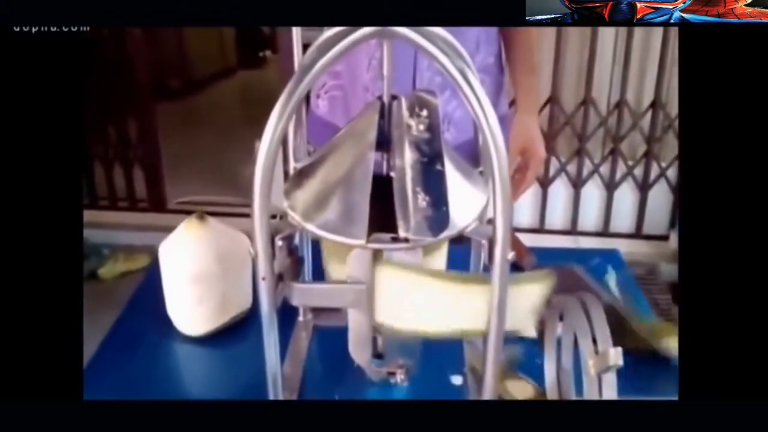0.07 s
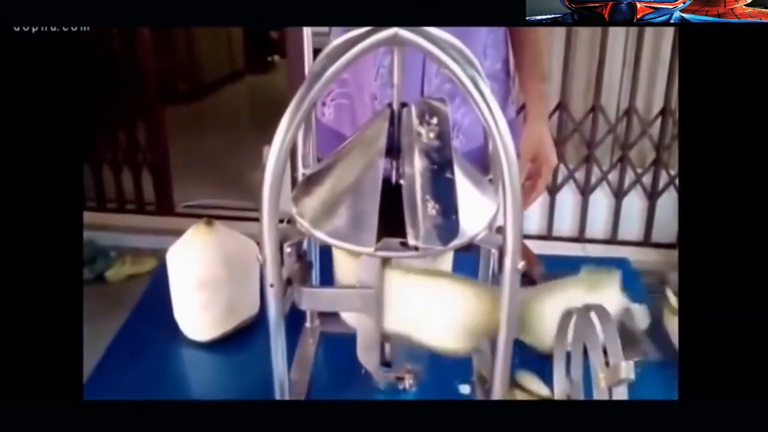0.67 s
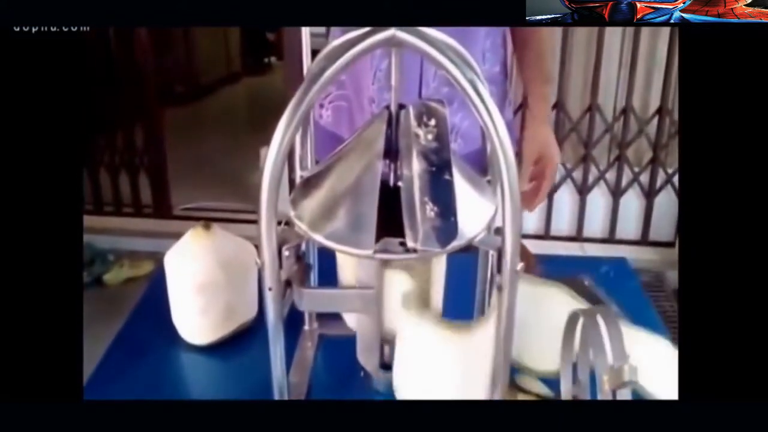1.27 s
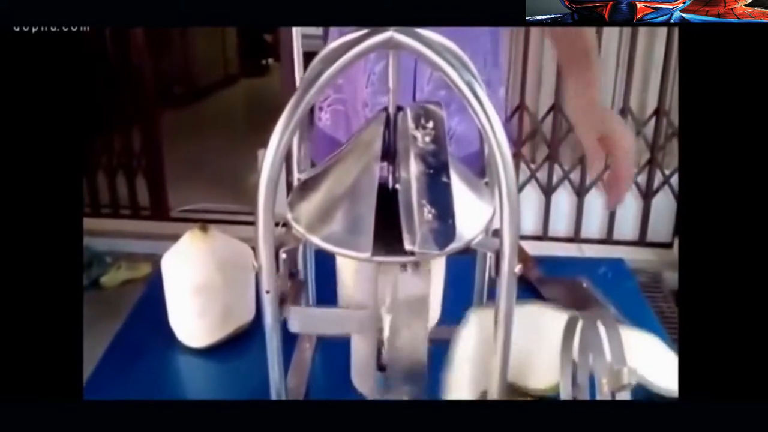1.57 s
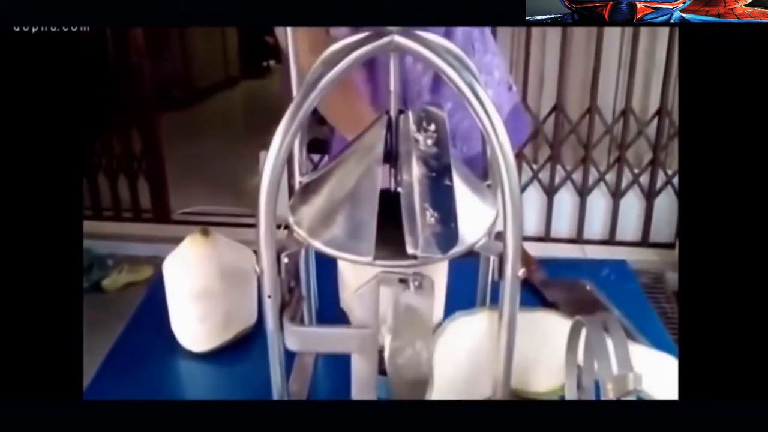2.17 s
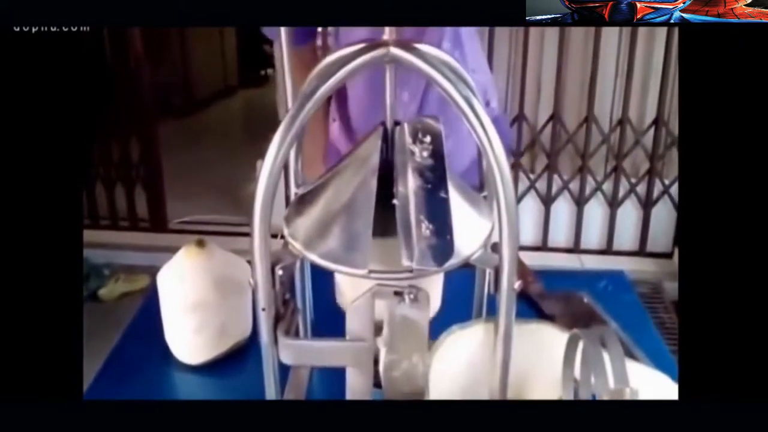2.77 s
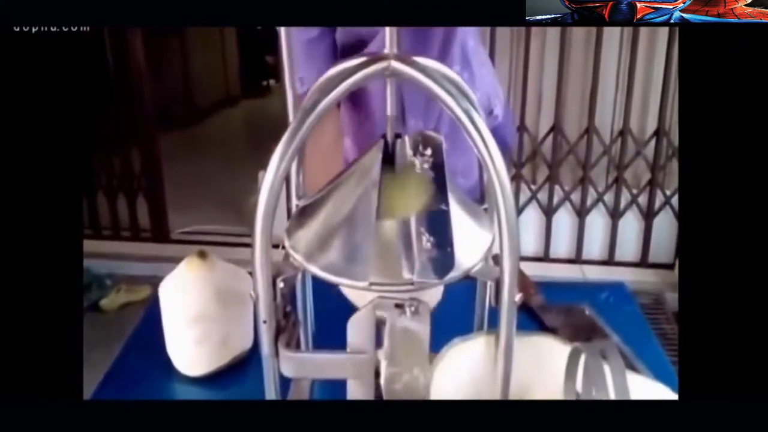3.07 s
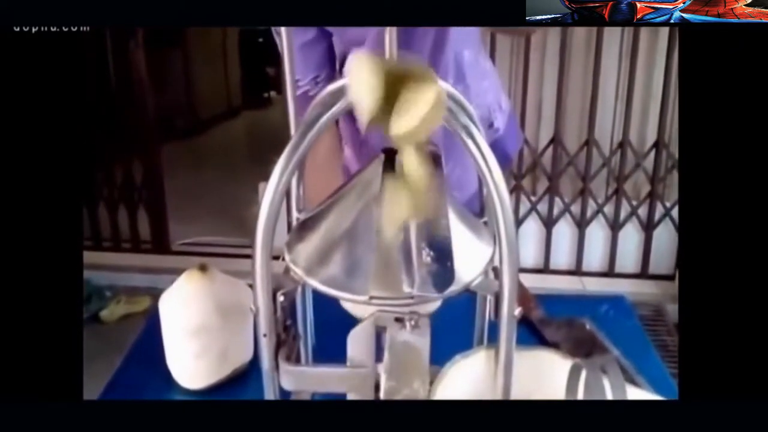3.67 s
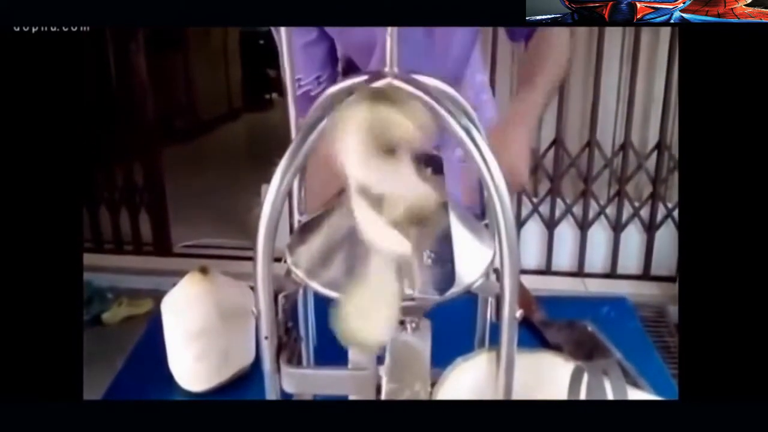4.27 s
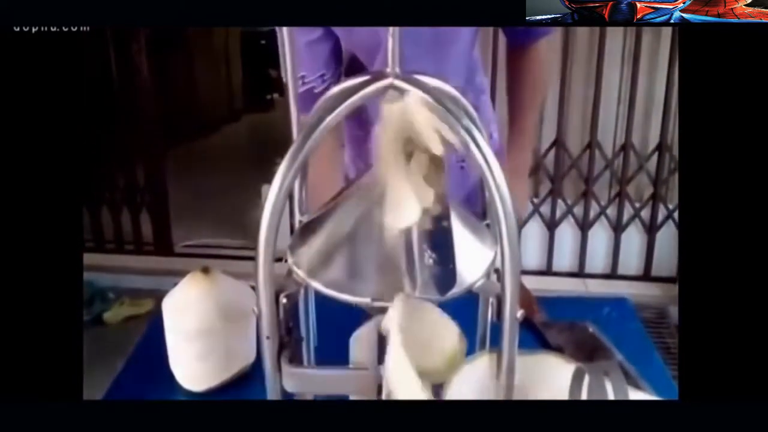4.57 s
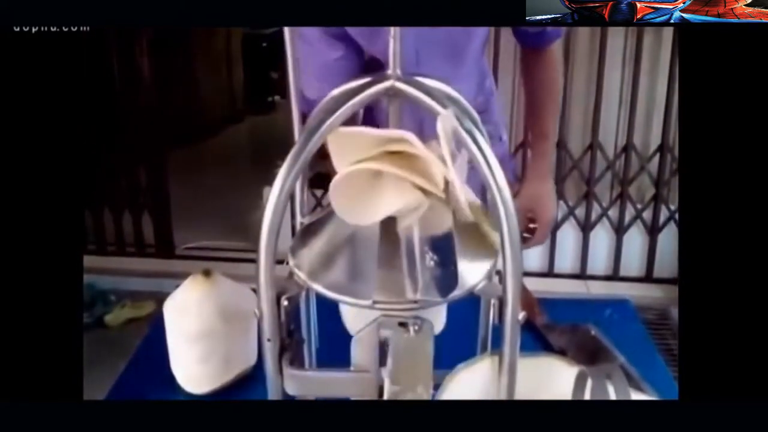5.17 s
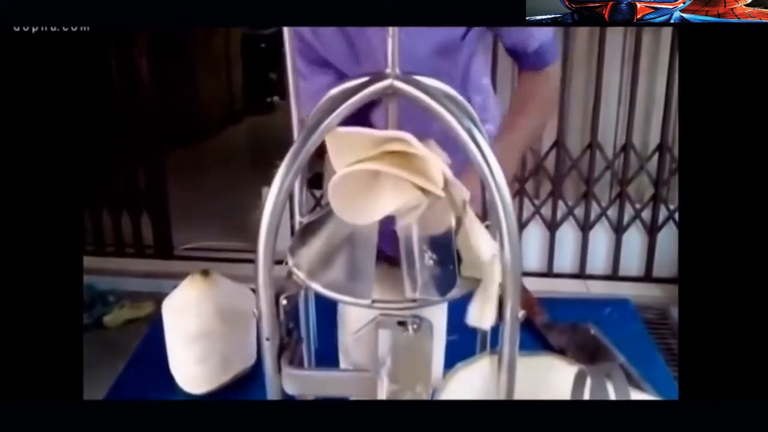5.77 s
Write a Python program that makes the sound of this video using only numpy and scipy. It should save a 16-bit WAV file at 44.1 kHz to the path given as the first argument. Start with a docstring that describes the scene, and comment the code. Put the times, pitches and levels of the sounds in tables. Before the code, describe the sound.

A spinning coconut scrapes and squeaks against steel blades in two rough, hissing cuts, with a motor whirring underneath.

```python
"""In a workshop, close up, a motor spins a green coconut against two steel blades.
The side blade tears off the skin, then slices a long wet ribbon; the nut idles, squeaking on the steel.
The cone blade bites into the top, breaks off a chunk and shaves on until it lifts and the motor runs down.
Each cut is a stream of snapping fibres over smooth friction; squeaks are husk sticking and slipping,
and the drive whirrs and hums underneath."""
import sys
import numpy as np
from scipy import signal
from scipy.fft import rfft, irfft, next_fast_len
from scipy.io import wavfile
from scipy.ndimage import uniform_filter1d, minimum_filter1d, map_coordinates

SR = 44100
rng = np.random.default_rng(int(sys.argv[2]) if len(sys.argv) > 2 else 0)


def output_pcm(signal):
    """Save a mono or channel-first signal as 16-bit PCM at the path in sys.argv[1].

    Samples are clipped to [-1, 1] before scaling.
    """
    pcm = np.clip(np.atleast_2d(signal).T, -1, 1) * 32767
    wavfile.write(sys.argv[1], SR, np.round(pcm).astype(np.int16))


N = 265305


def amp(db):
    """Decibels to gain."""
    return 10 ** (np.asarray(db) / 20)


def unit(x):
    """Scaled to rms 1."""
    return x / np.sqrt(np.mean(x ** 2) + 1e-20)


def seconds():
    """The time of every sample."""
    return np.arange(N) / SR


def curves(rows):
    """One breakpoint envelope for each column after the time; -120 outside the rows."""
    times, *columns = np.transpose(rows)
    return [np.interp(seconds(), times, column, left=-120, right=-120) for column in columns]


def strokes(rows, release_db_per_s):
    """Attack, hold and release for each stroke: one dB envelope for each level column."""
    t, levels = seconds(), []
    for start, attack_s, length, *dbs in rows:
        rise = np.clip((t - start) / attack_s, 1e-6, 1)
        shape_db = 20 * np.log10(rise) - release_db_per_s * np.maximum(t - start - length, 0)
        levels.append([db + shape_db for db in dbs])
    return np.max(levels, axis=0)


def wobble(rate):
    """A smooth random modulator, rate knots a second."""
    return map_coordinates(rng.standard_normal(int(N * rate / SR) + 4), [np.arange(N) * rate / SR])


def filtered(x, response):
    """x through a gain that depends on frequency."""
    size = next_fast_len(N + 8192)
    return irfft(rfft(x, size) * response(np.fft.rfftfreq(size, 1 / SR)), size)[..., :N]


def colour(points):
    """An EQ curve through points of f/Hz, level/dB on a log axis."""
    f, db = np.transpose(points)
    return lambda hz: amp(np.interp(np.log(hz + 1), np.log(f + 1), db))


def snaps(rate, spread_db, clump_db, bed):
    """Fibres breaking at random, rate a second, in clumps over a bed of smooth friction."""
    breaks = (rng.random(N) < rate / SR) * rng.choice([-1, 1], N)
    sizes = amp(spread_db * rng.uniform(-0.61, 1, N))
    texture = unit(breaks * sizes) + bed * rng.standard_normal(N)
    return unit(texture * amp(clump_db * np.tanh(wobble(70) + wobble(330))))


def drifting(x, depth_db, edge=None):
    """Energy wanders between pitches at an unchanged level; edge is an optional moving low cut."""
    hz, t, spectrum = signal.stft(x, SR, nperseg=1024)
    drift = rng.standard_normal(spectrum.shape)
    for _ in range(2):
        drift = uniform_filter1d(uniform_filter1d(drift, size=3, axis=0), size=7, axis=1)
    shifted = spectrum * amp(depth_db * unit(drift).clip(-2, 2))
    if edge is not None:
        above_hz = hz[:, None] - np.interp(t, *np.transpose(edge))
        shifted *= .53 + .47 * np.tanh(above_hz / 140)
    shifted *= np.linalg.norm(spectrum, axis=0) / (np.linalg.norm(shifted, axis=0) + 1e-12)
    return signal.istft(shifted, SR, nperseg=1024)[1][:N]


def scrape(fibres, eq, level_db, drift_db, edge=None):
    """A friction texture sounding through one part of the machine, its colour drifting."""
    return amp(level_db) * unit(drifting(filtered(fibres, colour(eq)), drift_db, edge))


def narrow(hz, width_hz):
    """Uneven slipping in one resonance: a narrow noise band around a moving pitch."""
    lowpass = signal.butter(2, width_hz / 2, fs=SR, output="sos")
    slip = signal.sosfilt(lowpass, rng.standard_normal((2, N)))
    phase = 2 * np.pi * np.cumsum(hz) / SR
    return unit(slip[0] * np.cos(phase) + slip[1] * np.sin(phase))


def ringing(modes, wander, swell_db=5):
    """Friction feeds narrow resonances, each gliding and swelling on its own."""
    out = np.zeros(N)
    for hz, width_hz, db in modes:
        band = narrow(hz * (1 + wander * wobble(9)), width_hz)
        out += amp(db) * unit(band * amp(swell_db * np.tanh(wobble(14))))
    return unit(out)


def air():
    """The workshop's still air: two independent channels of soft room tone."""
    air_eq = [(20, -12), (70, -6.5), (130, -4), (400, 0.5), (2500, -7.5), (5000, -10.5), (8000, -39)]  # room tone: f/Hz, level/dB
    return unit(filtered(rng.standard_normal((2, N)), colour(air_eq)))


def drive():
    """The spindle whirrs, rings the frame and hums through the table; the side blade's load lifts it."""
    whirr_eq = [(260, -30), (450, -11.5), (740, -4.5), (1020, -5.5), (1200, -9), (1300, -7), (1590, -10),
                (1640, -6), (2120, -7), (2290, -6), (2990, -8), (3640, -1.5), (4920, -4), (7120, -22.5),
                (9260, -40), (15700, -120)]  # spindle friction: f/Hz, level/dB
    frame_modes = [(730, 23, -3.5), (1258, 14, -0.5), (1470, 28, 1.5), (1707, 18, 5), (2340, 18, 4.5),
                   (4040, 180, 0.5), (4160, 27, 2.5)]  # frame resonances: f/Hz, width/Hz, level/dB
    rumble_eq = [(20, -33), (40, -25), (75, -13), (110, -9.5), (145, 4), (200, -2.5), (240, -6.5),
                 (370, 2.5), (480, -10), (560, -29), (730, -41.5), (1200, -120)]  # rumble through the table: f/Hz, level/dB
    motor_tones = [(100, -7.5), (142, -1), (172, -1.5), (200, -2.5)]  # motor hum: f/Hz, level/dB
    load_end_s, load_ease_s, motor_off_s = 1.784, 0.57, 5.58
    whirr_fade_db_per_s, hum_fade_db_per_s = 51, 37
    t = seconds()
    load = np.exp(-np.maximum(t - load_end_s, 0) / load_ease_s)
    coasting_s = np.maximum(t - motor_off_s, 0)
    whirr_db = -52 + 8.5 * load - whirr_fade_db_per_s * coasting_s
    hum_db = -62.5 + 7 * load - hum_fade_db_per_s * coasting_s
    rub = snaps(rate=1500, spread_db=2, clump_db=1, bed=1)
    whirr = scrape(rub, whirr_eq, whirr_db, drift_db=3)
    singing = amp(whirr_db - 6.5) * ringing(frame_modes, wander=0.00098)
    rumble = scrape(rng.standard_normal(N), rumble_eq, hum_db + 1.5 * wobble(8), drift_db=5)
    hum = sum(amp(db + 2.1 * wobble(5.5)) * np.sin(2 * np.pi * hz * t + 0.55 * wobble(7.1))
              for hz, db in motor_tones)
    return whirr + singing + rumble + amp(hum_db - 5) * hum


def skin():
    """The side blade tears through tough skin and shakes the frame; each turn starts fresh, then dulls."""
    # one stroke per turn of the nut: t/s, attack/s, length/s, hiss/dB, tearing/dB
    turns = [(-0.025, 0.023, 0.31, -21.5, -25.5), (0.285, 0.029, 0.27, -17, -24.5)]
    hiss_eq = [(2240, -24), (3800, -13), (4240, -5), (4980, 1), (5620, -5), (6550, -5.5), (6900, -12),
               (7120, -15.5), (9260, -45), (15700, -120)]  # steel through skin: f/Hz, level/dB
    tearing_eq = [(250, -48), (420, -30), (534, -21.5), (720, -1.5), (849, -5.5), (1350, -5.5), (1500, 0),
                  (2000, -2), (2310, 1), (3890, -4.5), (4200, -3.5), (5460, -28.5), (9240, -120)]  # midrange of the tear: f/Hz, level/dB
    shudder_eq = [(20, -42), (40, -36), (70, -27), (110, -18.5), (135, 6), (165, 9), (205, -6.5),
                  (260, -2.5), (340, -2), (460, -1.5), (540, -33), (700, -43), (1140, -120)]  # the shaking frame: f/Hz, level/dB
    fresh_s, dulling_db_per_s = 0.15, 56.5
    hiss_db, tear_db = strokes(turns, release_db_per_s=216)
    t, starts = seconds(), np.transpose(turns)[0]
    into_turn_s = t - starts[np.maximum(np.searchsorted(starts, t) - 1, 0)]
    hiss_db = hiss_db - dulling_db_per_s * np.maximum(into_turn_s - fresh_s, 0) + 2 * wobble(24.13)
    fibres = snaps(rate=3000, spread_db=-2, clump_db=-0.5, bed=0.32)
    hiss = scrape(fibres, hiss_eq, hiss_db, drift_db=2) + fizz(fibres, hiss_db - 25.5)
    tearing = scrape(fibres, tearing_eq, tear_db, drift_db=3)
    shudder = scrape(fibres, shudder_eq, tear_db - 10.5 + 1.1 * wobble(8.6), drift_db=5)
    return hiss + tearing + shudder


def fizz(fibres, level_db):
    """A faint, very high fizz above 8 kHz that follows the cutting hiss."""
    return amp(level_db) * unit(filtered(fibres + rng.standard_normal(N), lambda hz: hz > 8000))


def stick_slip(rows):
    """Brief squeaks, each swelling to its time and fading around one unsteady, gliding pitch."""
    out = np.zeros(N + SR)
    for centre, half_length, hz, width_hz, db, glide in rows:
        t = np.arange(int(2 * half_length * SR)) / SR
        lowpass = signal.butter(2, width_hz / 2, fs=SR, output="sos")
        noise = signal.sosfilt(lowpass, rng.standard_normal((2, SR // 2)))[:, -len(t):]
        slip = noise[0] + 1j * noise[1]
        slip /= np.abs(slip) ** 0.5  # compress the flutter for a steadier tone
        pitch = hz * (1 + glide * (t / half_length - 1))
        tone = unit(np.real(slip * np.exp(2j * np.pi * np.cumsum(pitch) / SR)))
        out[round((centre - half_length) * SR):][:len(t)] += amp(db) * tone * np.hanning(len(t)) ** 2
    return out[:N]


def squeaks():
    """The foreground squeaks of husk sticking and slipping on steel."""
    # slips: centre t/s, half length/s, f/Hz, width/Hz, level/dB, glide/share of pitch
    slips = [(0.1, 0.041, 708, 110, -32, -0.013), (0.245, 0.037, 732, 120, -26, -.04),
             (0.29, 0.094, 176, 91, -35, 0), (0.48, 0.057, 728, 120, -31.5, 0.0046),
             (0.62, 0.074, 728, 130, -33, -0.0059), (0.64, 0.071, 1664, 150, -39, 0.033),
             (0.715, 0.047, 880, 110, -38.5, 0.075), (0.745, 0.043, 2220, 170, -30, -0.092),
             (0.765, .07, 3450, 350, -29.5, 0), (0.79, 0.077, 1676, 190, -31.5, -0.073),
             (0.8, 0.06, 2660, 220, -33, -0.022), (0.815, 0.054, 780, 110, -42, -.06),
             (0.865, 0.07, 2365, 260, -40, -0.000096), (0.88, 0.053, 1638, 150, -34.5, -0.046),
             (0.935, 0.059, 2870, 130, -38, 0), (0.99, .06, 1582, 132, -36, .06),
             (1.015, 0.048, 3020, 160, -32.5, -0.013), (1.076, .075, 2575, 199, -31.5, 0.031),
             (1.101, 0.063, 799, 100, -33, -0.02), (1.152, 0.085, 1703, 160, -36, -0.08),
             (1.21, 0.043, 2430, 220, -36, 0.048), (1.339, 0.097, 2235, 110, -39, -0.1),
             (1.358, 0.054, 761, 100, -36.5, .04), (1.482, 0.063, 798, 120, -41, -0.043),
             (1.495, 0.059, 3070, 350, -34.5, 0.089), (1.56, 0.06, 1805, 170, -38.5, 0.07),
             (1.638, .06, 3180, 170, -29.5, 0.032), (2.92, 0.037, 2310, 50, -50, 0.0036),
             (3.083, 0.068, 720, 110, -46, -.04), (3.213, 0.073, 2323, 60, -48, -0.0024),
             (3.462, 0.067, 1340, 110, -31, 0.0166), (3.545, 0.066, 719, 130, -41.5, 0),
             (3.58, .045, 4520, 80, -44, 0), (3.642, .022, 4640, 160, -26, .02),
             (3.678, 0.019, 4680, 200, -24, -0.019), (4.01, 0.054, 3030, 150, -38, -0.041),
             (4.2, 0.063, 2290, 170, -40.5, 0), (4.22, 0.069, 1375, 140, -44.5, -.05),
             (4.423, 0.03, 2230, 169, -34, 0.031), (4.58, .07, 1524, 200, -40, 0.038),
             (4.6, .06, 2280, 200, -42, -.04), (4.695, .037, 722, 101, -47, 0.0015),
             (4.949, .14, 1520, 170, -41.5, -.03), (5.138, .059, 2260, 290, -32, -.06),
             (5.141, 0.049, 1353, 201, -38, 0.0021), (5.17, 0.066, 6360, 160, -41, 0),
             (5.196, 0.036, 2340, 130, -37.5, 0.0051), (5.304, 0.065, 4150, 380, -36.5, 0),
             (5.354, 0.1, 2270, 140, -38, -0.023), (5.401, 0.1, 1013, 258, -40, -0.0092),
             (5.485, 0.11, 831, 130, -44.5, -0.11), (5.51, 0.041, 4270, 420, -43, 0)]
    return stick_slip(slips)


def knocks():
    """A chunk cracks off or strikes the frame: a short clack over a dull thud."""
    hits = [(0.185, -14, -4.5, 0.18), (0.234, -17, -24, 0.12), (3.802, -27, -3, 0.097),
            (3.9001, -6, -16, 0.082), (5.277, -35, -18, 0.072), (5.701, -38, -41, 0.098)]  # husk impacts: t/s, level/dB, relative thud/dB, t60/s
    # the two layers of a hit: f/Hz, level/dB
    clack_eq = [(150, -28.5), (400, -5), (750, 0.5), (1100, 5.5), (1700, -7), (2400, 3), (3900, 3.5),
                (5000, -6.5), (7000, -30.5), (9000, -70)]
    thud_eq = [(40, -26), (90, -18), (140, -3), (320, 3.5), (500, 6), (900, -45)]
    clack = unit(filtered(rng.standard_normal(N), colour(clack_eq)))
    thud = unit(filtered(rng.standard_normal(N), colour(thud_eq)))
    out, t = np.zeros(N + SR), np.arange(SR // 2) / SR
    for start, db, thud_db, t60 in hits:
        at = round(start * SR)
        blow = (clack + amp(thud_db + 2) * thud)[at:at + len(t)]
        envelope = amp(-60 * t / t60) * (1 - np.exp(-t / 0.00054))
        out[at:at + len(blow)] += amp(db - 6.5) * blow * envelope[:len(blow)]
    return out[:N]


def tears():
    """A bundle of fibres gives way at once: a sudden bright crackle that dies quickly."""
    bundles = [(0.5, .008, -18.5), (0.524, 0.026, -16.5), (1.38, 0.014, -21), (3.42, .004, -16),
               (3.623, .006, -29.5), (3.641, 0.0091, -25.5), (3.81, .006, -27.5), (3.883, 0.009, -22),
               (4.001, 0.017, -33), (4.211, .022, -29.5), (4.286, 0.011, -24.5), (4.367, 0.0054, -28),
               (4.414, .008, -30.5), (4.549, 0.0045, -29.5), (4.583, 0.008, -26), (4.797, .012, -30.5),
               (4.835, .012, -30)]  # breaking bundles: t/s, length/s, level/dB
    crackle_eq = [(1000, -33), (2400, -16.5), (3350, -21.5), (4200, -5), (4750, 1), (5150, -5), (5400, -5),
                  (5750, -6.5), (6400, -7), (7200, -21.5), (9200, -51.5)]  # their crackle: f/Hz, level/dB
    attack_s = .0015
    bursts = [(start, attack_s, length, db) for start, length, db in bundles]
    level_db, = strokes(bursts, release_db_per_s=598)
    fibres = snaps(rate=900, spread_db=0.5, clump_db=1, bed=0.43)
    return scrape(fibres, crackle_eq, level_db, drift_db=5) + fizz(fibres, level_db - 26)


def ribbon():
    """The side blade slices soft husk; the curling ribbon squeals and chirps, most in a deep cut."""
    cut = [(0.58, -34), (0.6, -32.5), (0.686, -29.5), (0.726, -19.5), (0.835, -22.5), (0.852, -17),
           (0.894, -22.5), (0.95, -20), (1.05, -17.5), (1.25, -20), (1.37, -18), (1.494, -20), (1.566, -25),
           (1.586, -28), (1.64, -26.5), (1.69, -26.5), (1.704, -21), (1.742, -38), (1.77, -56)]  # envelope of the slice's hiss: t/s, level/dB
    edge = [(.6, 4700), (.7, 4570), (.73, 3950), (.95, 4060), (.985, 4410), (1.03, 4100), (1.23, 4120),
            (1.27, 4990), (1.35, 4900), (1.39, 4350), (1.555, 4120), (1.61, 5100), (1.72, 5400)]  # the hiss's low cut, rising as the cut gets shallow: t/s, f/Hz
    slice_eq = [(2060, -48), (3600, -16), (4200, -4), (4900, -3.5), (5870, 0.5), (6490, -3.5),
                (7120, -10.5), (9260, -63.5), (15700, -120)]  # steel through wet husk: f/Hz, level/dB
    curl_eq = [(260, -17), (450, -13.5), (553, -31), (640, -10), (803, -6.5), (942, -14.5), (1250, -21),
               (1590, -6.5), (2010, -8.5), (2250, -8), (2460, -13.5), (2680, -4.5), (3050, -10), (3450, -6),
               (3850, -9.5), (4200, -8), (5460, -41), (9240, -120)]  # rasp of the curling ribbon: f/Hz, level/dB
    loss_db_per_octave, fade_db_per_s = 10.5, 3
    t = seconds()
    hiss_db, = curves(cut)
    edge_s, edge_hz = np.transpose(edge)
    edge_octaves = np.log2(np.interp(t, edge_s, edge_hz) / edge_hz.min())
    curl_db = -28.5 - loss_db_per_octave * edge_octaves - fade_db_per_s * (t - edge_s[0])
    curl_db = np.minimum(curl_db, hiss_db - 6)  # keep the curl tucked under the hiss
    fibres = snaps(rate=2000, spread_db=-6, clump_db=1, bed=0.92)
    hiss = scrape(fibres, slice_eq, hiss_db + 1.2 * wobble(27.96), drift_db=3, edge=edge)
    hiss += fizz(fibres, hiss_db - 19)
    squeal = amp(curl_db - 12) * curl_squeals()
    rasp = scrape(fibres, curl_eq, curl_db - 7, drift_db=5)
    return hiss + squeal + rasp + chirps(cut, curl_db - 9.5)


def curl_squeals():
    """The ribbon catches and lets go: each resonance sounds in separate, wavering spurts."""
    modes = [(826, 81, -7.5), (1656, 130, -2), (2260, 130, 6), (2830, 86, 7.5), (3410, 200, -2.5)]  # ribbon resonances: f/Hz, width/Hz, level/dB
    out = np.zeros(N)
    for hz, width_hz, db in modes:
        caught = np.clip(wobble(24), 0, 1)
        out += amp(db) * unit(caught * narrow(hz * (1 + .03 * wobble(18)), width_hz))
    return unit(out)


def chirps(cut, level_db):
    """Faint squeaks scattered over the span of a cut, riding the given envelope."""
    per_s, half_length_s, max_glide = 13, .045, 0.0745
    low_hz, high_hz, width_hz = 1350, 3276, 140
    start, end = cut[0][0], cut[-1][0]
    jitter, height, bend = rng.random((int(per_s * (end - start)), 3)).T
    times = start + (np.arange(len(jitter)) + jitter) / per_s
    pitches = low_hz * (high_hz / low_hz) ** height
    glides = max_glide * (2 * bend - 1)
    return stick_slip([(s, half_length_s, hz, width_hz, level_db[round(s * SR)], glide)
                       for s, hz, glide in zip(times, pitches, glides)])


def clinks():
    """Scraps tap the steel: a sharp tick, then the blade's modes ring out."""
    taps = [(2.324, -43.5, -45.5, 6.5), (3.02, -43.5, -41.5, -16), (3.179, -50, -50, -3)]  # scraps landing: t/s, tick/dB, ring/dB, ring tilt/(dB per octave)
    steel_modes = [(1698, -1, 0.11), (2350, -5.5, 0.58), (4075, -0.5, 0.2), (4700, -11, .13)]  # the struck blade: f/Hz, level/dB, t60/s
    tick_t60_s, tick_attack_s = 0.2, 0.0018
    out, t = np.zeros(N + SR), np.arange(SR // 2) / SR
    band = signal.butter(5, [1300, 4900], "bandpass", fs=SR, output="sos")
    for start, tick_db, ring_db, tilt_db in taps:
        envelope = amp(tick_db - 60 * t / tick_t60_s) * (1 - np.exp(-t / tick_attack_s))
        clink = envelope * unit(signal.sosfilt(band, rng.standard_normal(len(t))))
        for hz, db, t60 in steel_modes:
            mode_db = ring_db + db + tilt_db * np.log2(hz / steel_modes[0][0])
            clink += amp(mode_db - 60 * t / t60) * np.sin(2 * np.pi * hz * t)
        out[round(start * SR):][:len(t)] += clink
    return out[:N]


def idle_rubs(count):
    """The idling nut brushes the steel once a turn at one pitch, loudest in the middle of the run."""
    first_s, turn_s, loudest_s, fade_db_per_s = 2.346, .161, 2.576, 54
    half_length_s, hz, width_hz = .065, 2314, 70
    times = first_s + turn_s * np.arange(count)
    levels_db = np.maximum(-36.5 - fade_db_per_s * np.abs(times - loudest_s), -54.5)
    return stick_slip([(s, half_length_s, hz, width_hz, db, 0) for s, db in zip(times, levels_db)])


def cone():
    """The cone blade rings as it bites into the top and then shaves it in uneven spurts."""
    bites = [(3.368, 0.013, .035, -37, -46), (3.394, 0.028, 0.069, -17, -26),
             (3.48, 0.03, 0.057, -24, -26.5), (3.62, 0.0047, 0.21, -25.5, -34),
             (3.785, 0.013, 0.043, -20, -24.5), (3.83, .015, 0.099, -22, -29),
             (5.1, 0.028, 0.068, -36, -37.5), (5.18, 0.018, 0.088, -40, -43),
             (5.262, 0.01, 0.09, -41.5, -47.5)]  # short bites: t/s, attack/s, length/s, hiss/dB, ring/dB
    shave = [(3.95, -26), (3.978, -33.5), (4.02, -33), (4.046, -37), (4.096, -27.5), (4.134, -32.5),
             (4.2, -30), (4.29, -26), (4.34, -29.5), (4.6, -26), (4.712, -28), (4.73, -37.5), (4.772, -28),
             (4.845, -26.5), (4.88, -31), (4.95, -33), (5.03, -42.5), (5.092, -47.5), (5.11, -40.5)]  # envelope of the long shave's hiss: t/s, level/dB
    hiss_eq = [(2060, -52), (3380, -22.5), (3660, -13.5), (4000, -6.5), (4270, -7.5), (4660, -3.5),
               (4880, -6), (5150, -10), (5350, -3), (5700, -11.5), (5950, -10.5), (6150, -6.5),
               (6400, -7.5), (6700, -15.5), (7000, -18.5), (7250, -24), (9260, -40), (15700, -120)]  # bright top of the cut: f/Hz, level/dB
    rasp_eq = [(120, -66), (200, -38), (534, -21), (680, -3.5), (994, -23), (1340, 6.5), (1560, -3.5),
               (1900, -2.5), (2250, -0.5), (2630, -7), (3020, 4), (3330, -18), (3900, -11), (5070, -26),
               (8580, -120)]  # grainy body of the cut: f/Hz, level/dB
    edge_modes = [(4434, 70, 0.5), (4675, 57.5, 2.5)]  # the thin edge singing: f/Hz, width/Hz, level/dB
    blade_modes = [(710, 126, -14.5), (1367, 81, 1), (1737, 150, -6.5), (2080, 140, -2.5), (2357, 140, 9),
                   (3033, 95, -4)]  # the blade with husk pressed on it: f/Hz, width/Hz, level/dB
    shave_db, = curves(shave)
    shave_ring_db = np.minimum(-37, shave_db - 7)  # an even ring that fades once the hiss drops
    spurts_db = 1.3 * wobble(40)
    bite_db, bite_ring_db = strokes(bites, release_db_per_s=338)
    hiss_db = np.maximum(bite_db, shave_db + spurts_db)
    ring_db = np.maximum(bite_ring_db, shave_ring_db + spurts_db)
    fibres = snaps(rate=1800, spread_db=5, clump_db=1.3, bed=0.79)
    hiss = scrape(fibres, hiss_eq, hiss_db - 2.5, drift_db=4.5) + fizz(fibres, hiss_db - 28.5)
    flicks = amp(hiss_db - 10) * pings()
    singing = amp(hiss_db - 8) * ringing(edge_modes, wander=.01)
    ring = amp(ring_db - 6.5) * ringing(blade_modes, wander=0.028)
    rasp = scrape(fibres, rasp_eq, ring_db - 7.5, drift_db=5)
    return hiss + flicks + singing + ring + rasp + chirps(shave, shave_ring_db - 5.5)


def pings():
    """Single fibres flick the cone blade's edge, each with its own pitch and size."""
    per_s, centre_hz, detune, t60_s, range_db = 130, 4680, .045, 0.05, 17
    out, t = np.zeros(N + SR), np.arange(SR // 25) / SR
    for k, (jitter, pitch, size) in enumerate(rng.random((int(per_s * N / SR), 3))):
        hz = centre_hz * (1 + detune * (2 * pitch - 1))
        ring = np.sin(2 * np.pi * hz * t) * amp(-60 * t / t60_s)
        out[int((k + 2 * jitter) / per_s * SR):][:len(t)] += amp(range_db * size) * ring
    return unit(out[:N])


def rip():
    """Coarse fibres tear ever harder and the bent husk groans downward as a chunk lets go."""
    tear_eq = [(240, -62), (400, -25), (607, -6.5), (657, -13.5), (900, -18.5), (1200, -11), (1750, -13),
               (2440, -5), (3050, 1), (3450, -15), (4000, -5), (4300, 1.5), (5590, -31), (9460, -120)]  # the top's skin ripping: f/Hz, level/dB
    groan = [(3.62, 694, -55), (3.66, 694, -54), (3.76, 760, -45), (3.818, 589, -38.5), (3.845, 408, -42),
             (3.862, 332, -35), (3.888, 231, -56), (3.94, 165.4, -48.5), (3.995, 192, -60)]  # husk bending away: t/s, f/Hz, level/dB
    break_s, build_s, growth_db_per_s, release_db_per_s = 3.905, .275, 20, 287
    before_s = np.maximum(break_s - seconds(), 0)
    after_s = np.maximum(seconds() - break_s, 0)
    tear_db = -28 - growth_db_per_s * before_s - release_db_per_s * after_s
    fibres = snaps(rate=1000, spread_db=7, clump_db=1.5, bed=0.6)
    tear = scrape(fibres, tear_eq, tear_db, drift_db=5) * (before_s < build_s)
    groan_hz, groan_db = curves(groan)
    return tear + amp(groan_db) * narrow(groan_hz, width_hz=90)


def room(x, t60):
    """A short diffuse answer from the walls, different on each side."""
    walls_eq = [(30, -2.5), (70, -3.5), (140, -6.5), (500, -8), (2000, -12), (5500, -16), (7300, -13),
                (9000, -2)]  # reverb return: f/Hz, level/dB
    t = np.arange(SR // 2) / SR
    tail = rng.standard_normal((2, len(t))) * amp(-60 * t / t60) * (t > .004)
    wet = signal.fftconvolve(x[None], tail / np.linalg.norm(tail[0]), axes=1)[:, :N]
    return filtered(wet, colour(walls_eq))


def scene():
    """Loud cuts and their reverb spread to the sides; the drive and light contacts stay in the middle."""
    lean = [(100, 2), (500, 3), (2000, 2), (5000, 3)]  # how much louder the cutting is on the right: f/Hz, level/dB
    wide_above_db = -35
    cutting = skin() + ribbon() + cone() + rip() + tears() + knocks() + clinks() + squeaks()
    panned = filtered(cutting, lambda hz: colour(lean)(hz) ** np.array([[-.5], [.5]]))
    left, right = panned + room(cutting, t60=0.077)
    power = np.abs(uniform_filter1d(cutting ** 2, size=SR // 10))
    width = power / (power + amp(wide_above_db) ** 2)
    air_mid, air_side = air()
    mid = (left + right) / 2 + drive() + idle_rubs(count=4) + amp(-63.5) * air_mid
    side = width * (left - right) / 2 + amp(-80.5) * air_side
    return np.array([mid + side, mid - side])


def record(dry):
    """A limiter holds the peaks; the tone has thin bass, a notch near 8 kHz and ends near 11 kHz."""
    master_eq = [(20, -18.5), (60, -12), (110, -1.5), (7000, 0), (7500, -6.5), (7850, -42), (8200, -15),
                 (8600, -1), (10500, 0), (11000, -15.5)]  # overall tone: f/Hz, level/dB
    ceiling, top_hz = .7, 11150
    needed = np.minimum(1, ceiling / (np.abs(dry).max(axis=0) + 1e-9))
    gain = uniform_filter1d(minimum_filter1d(needed, size=241), size=121)
    return filtered(dry * gain, lambda hz: colour(master_eq)(hz) * (hz < top_hz))


dry = scene()
out = record(dry)
output_pcm(out)
```